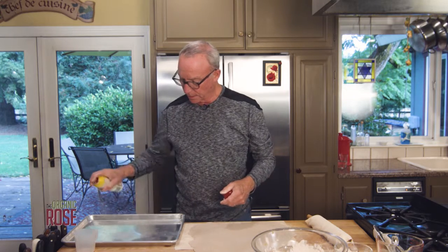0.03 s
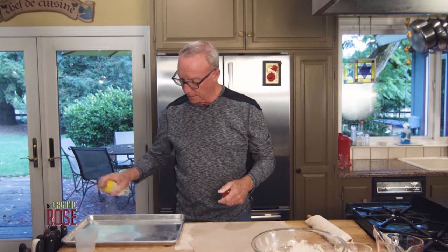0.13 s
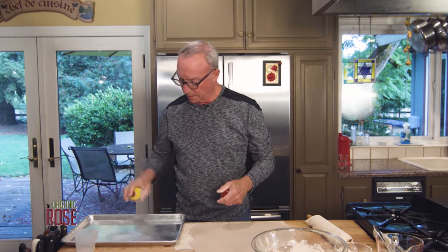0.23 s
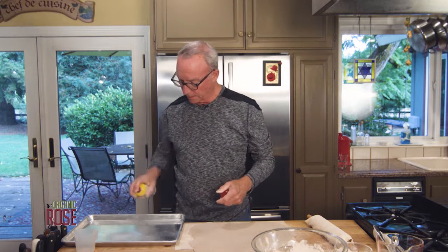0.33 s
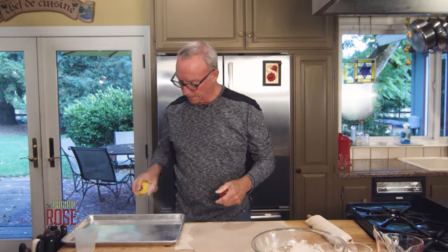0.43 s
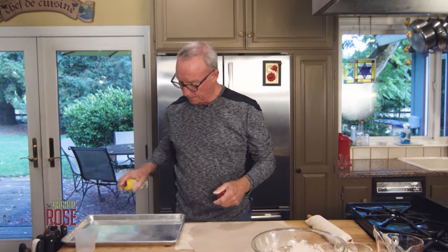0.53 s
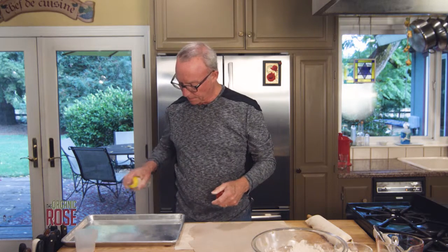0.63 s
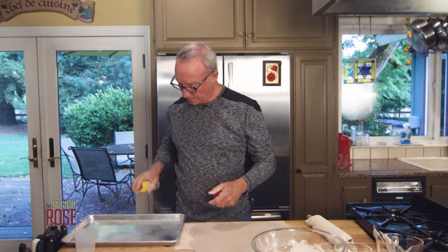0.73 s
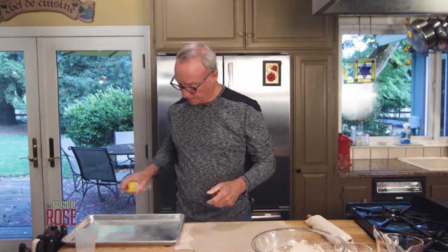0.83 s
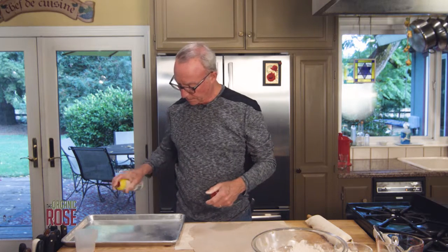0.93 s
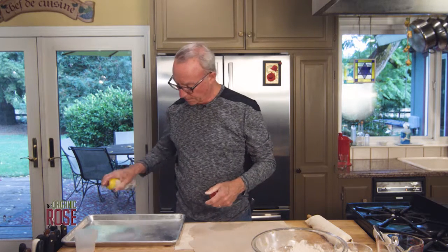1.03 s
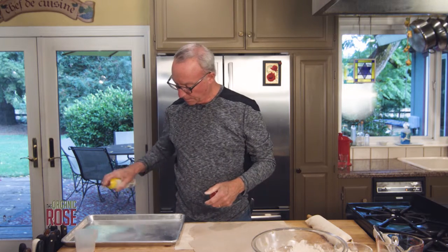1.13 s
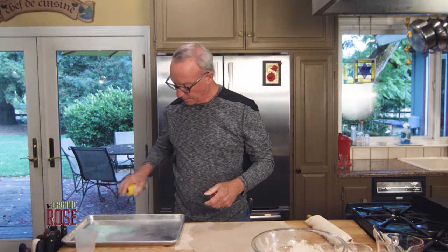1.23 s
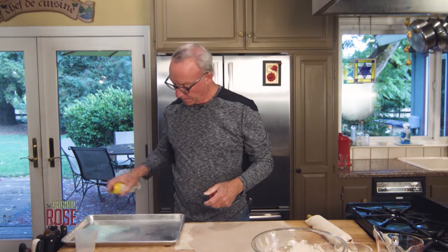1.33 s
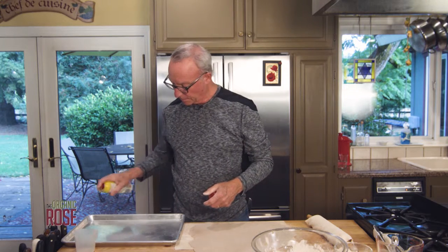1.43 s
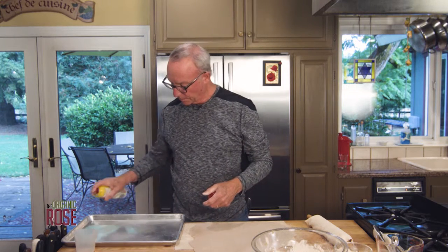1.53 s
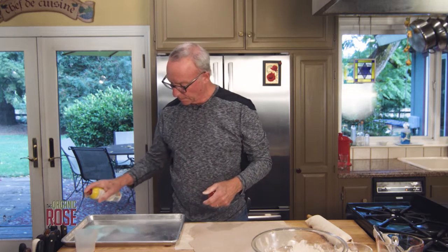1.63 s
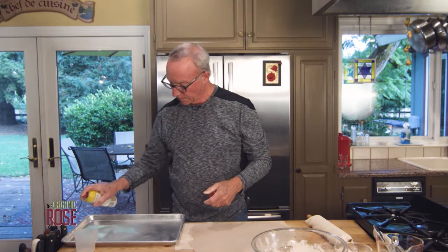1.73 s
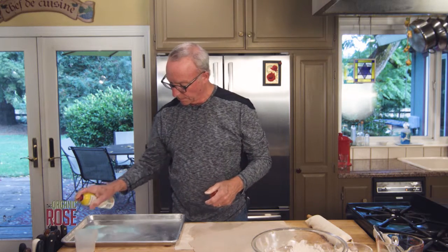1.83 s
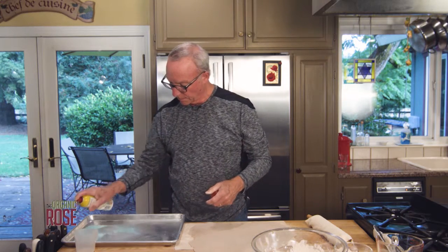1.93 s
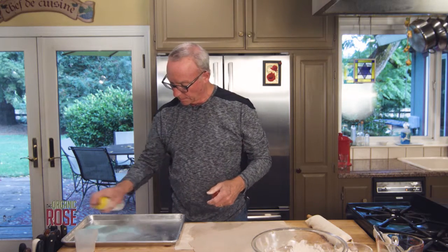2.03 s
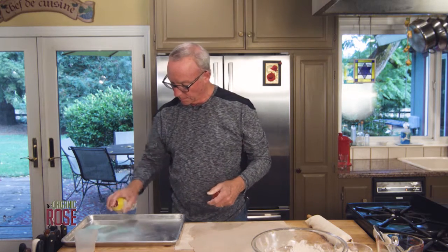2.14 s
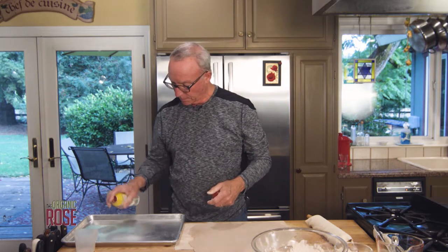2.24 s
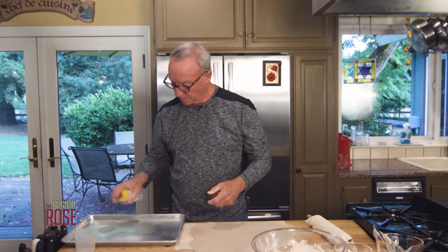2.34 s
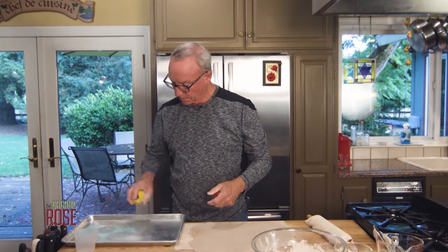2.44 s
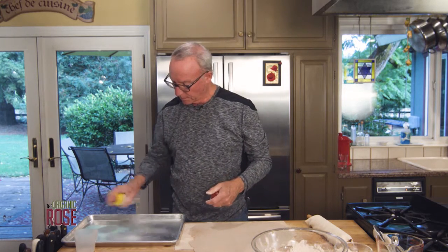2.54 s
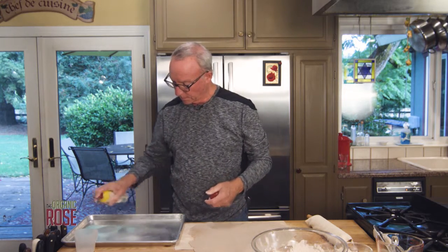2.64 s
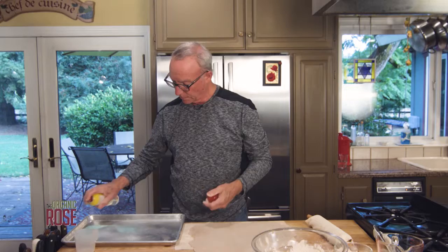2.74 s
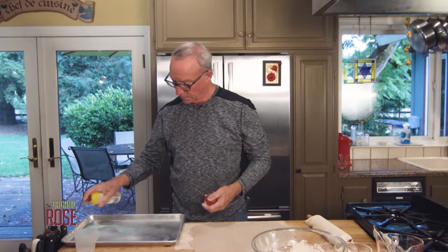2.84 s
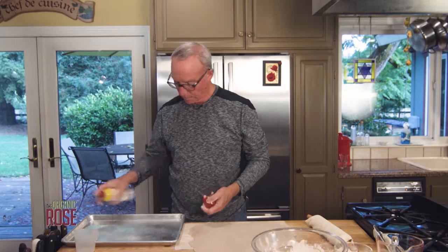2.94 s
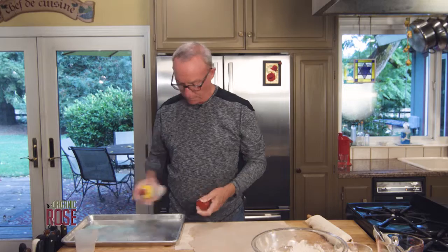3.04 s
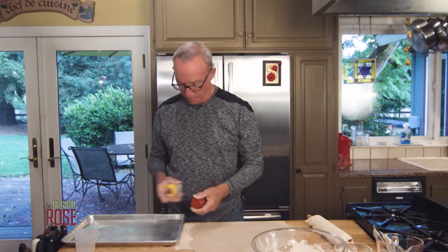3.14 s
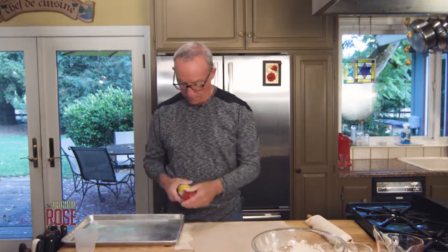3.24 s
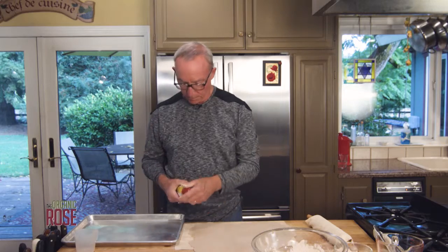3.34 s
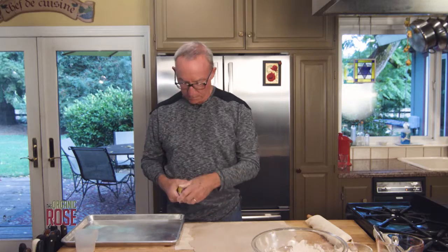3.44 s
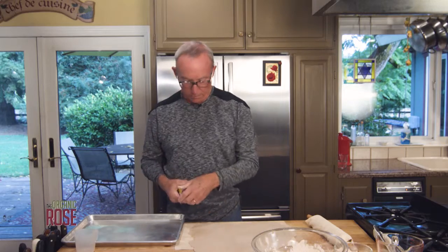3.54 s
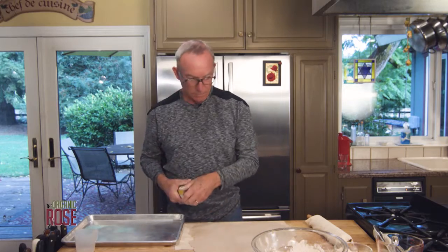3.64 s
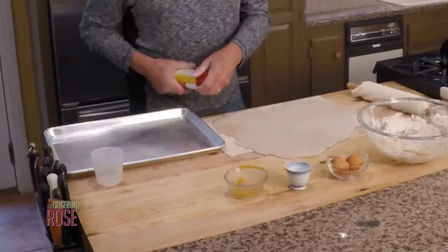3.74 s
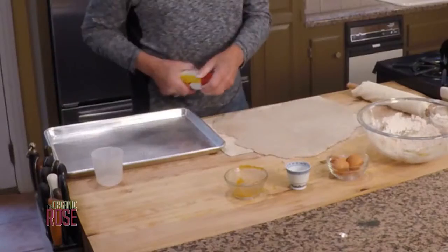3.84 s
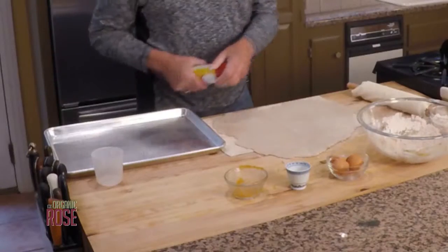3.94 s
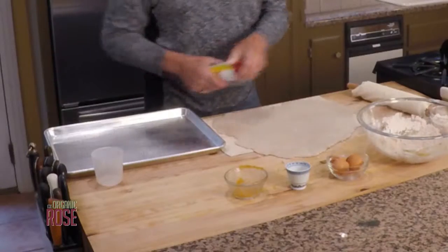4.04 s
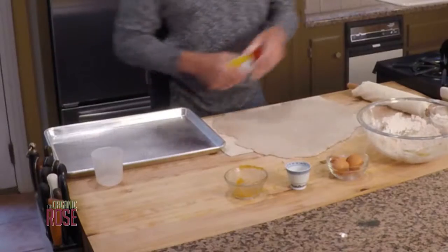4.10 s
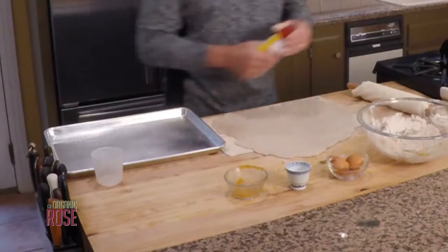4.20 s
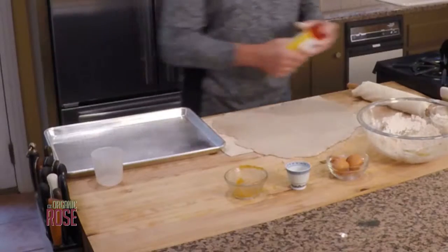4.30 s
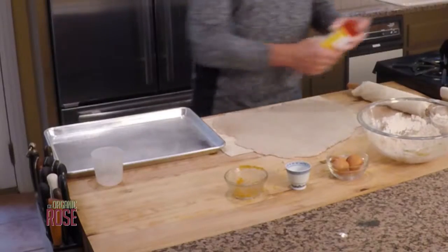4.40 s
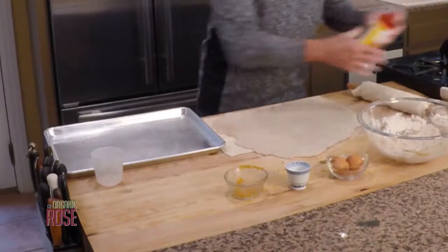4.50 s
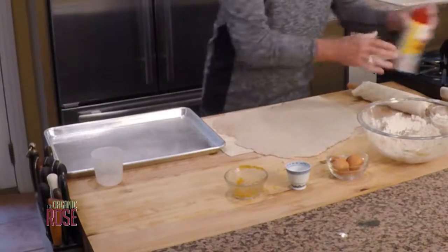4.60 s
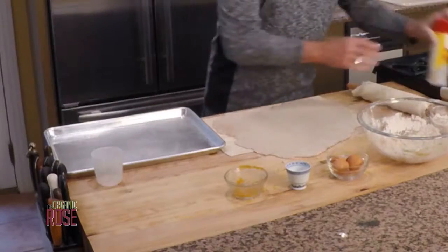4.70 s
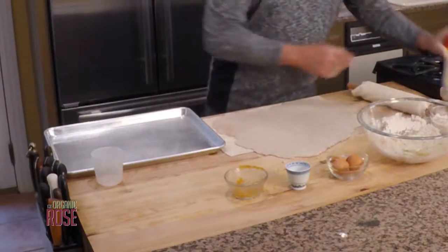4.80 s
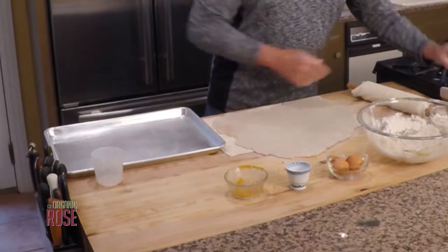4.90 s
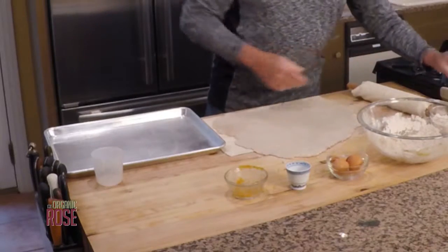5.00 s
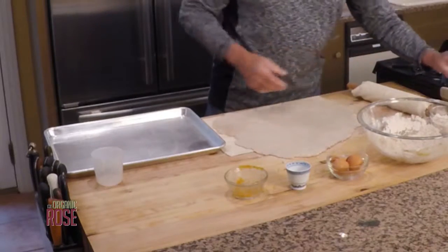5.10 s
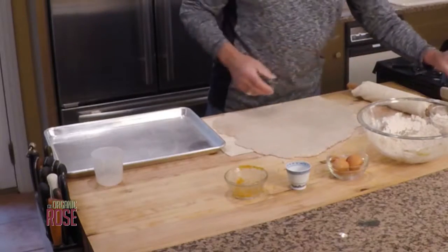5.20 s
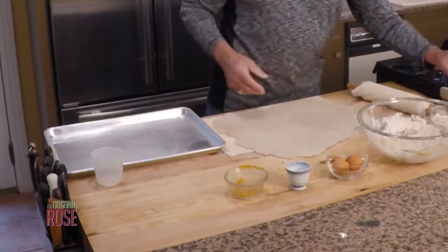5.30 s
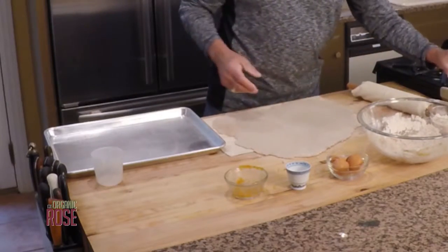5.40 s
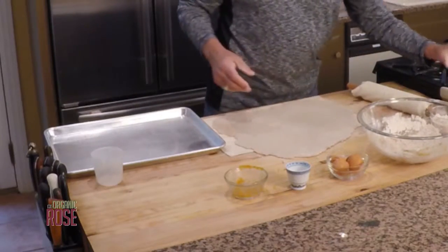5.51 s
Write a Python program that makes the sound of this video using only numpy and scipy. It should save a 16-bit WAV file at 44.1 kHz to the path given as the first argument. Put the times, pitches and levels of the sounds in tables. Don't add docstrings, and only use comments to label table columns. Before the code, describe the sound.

Quiet kitchen with a low fridge drone. A spray can hisses in short separate puffs, roughly four a second, over a metal baking sheet, the hiss colour gliding as it moves. Then soft skin rubbing and squeaking on plastic, a quick volley of cap clicks, more handling, and the can lands on a wooden counter with a firm double knock. Fairly close mono microphone, small live room.

```python
import sys
import numpy as np
from scipy import signal
from scipy.fft import rfft, irfft
from scipy.io import wavfile
from scipy.ndimage import map_coordinates

SR = 44100
rng = np.random.default_rng(int(sys.argv[2]) if len(sys.argv) > 2 else 0)


def volts_from_decibels(level):
    exponent = np.asarray(level, float) / 20
    return 10 ** exponent


def file_out(sig):
    cols = np.atleast_2d(sig).T
    lim = np.clip(cols, -1, 1)
    pcm = np.round(lim * 32767).astype(np.int16)
    wavfile.write(sys.argv[1], SR, pcm)


N = 245195
LEAD = 13230


def at_hz(points, hz):
    table_hz, values = np.transpose(points)
    return np.interp(np.log(hz), np.log(table_hz), values)


def in_time(rows):
    s, *columns = np.transpose(rows)
    now = (np.arange(N + LEAD) - LEAD) / SR
    return [np.interp(now, s, column) for column in columns]


def place(s):
    return int(round(s * SR)) + LEAD


def coloured(spectrum, low_hz=10, high_hz=20000):
    hz = np.maximum(np.fft.rfftfreq(N + LEAD, 1 / SR), 1)
    edges = np.sqrt((1 + (low_hz / hz) ** 10) * (1 + (hz / high_hz) ** 10))
    part = volts_from_decibels(at_hz(spectrum, hz)) / edges
    noise = irfft(rfft(rng.standard_normal(N + LEAD)) * part, N + LEAD)
    return noise / np.sqrt(np.mean(part ** 2))


def ring(clicks, hz, t60):
    r = volts_from_decibels(-60 / (t60 * SR))
    w = 2 * np.pi * hz / SR
    return signal.lfilter([0, np.sin(w)], [1, -2 * r * np.cos(w), r * r], clicks + 1e-18)


def strike(times, dbs, modes, scatter_db, contact_s):
    out = np.zeros(N + LEAD)
    luck = rng.standard_normal((len(times), len(modes)))
    first = place(min(times))
    span = min(SR // 2 + int(contact_s * SR), N + LEAD - first)
    t = np.arange(int(contact_s * SR) + 2) / SR
    for k, (hz, level_db, t60) in enumerate(modes):
        clicks = np.zeros(span)
        clicks[[place(s) - first for s in times]] = volts_from_decibels(dbs + level_db + scatter_db * luck[:, k])
        push = np.cos(2 * np.pi * hz * t) * 2 / len(t)
        pushed = signal.oaconvolve(clicks, push)[:span]
        out[first:first + span] += ring(pushed, hz, t60) * (-1) ** k
    return out


def blips(events):
    out = np.zeros(N + LEAD)
    for s, peak_db, hz, cycles in events:
        t = np.arange(int(1.5 * cycles / hz * SR)) / SR
        out[place(s):place(s) + len(t)] += volts_from_decibels(peak_db - 60 * t * hz / cycles) * np.sin(2 * np.pi * hz * t)
    return out


def swells(rows):
    out = np.zeros(N + LEAD)
    for s, rise, fall, db in rows:
        shape = np.r_[np.linspace(0, 1, int(rise * SR)), np.linspace(1, 0, int(fall * SR))]
        start = place(s) - int(rise * SR)
        out[start:start + len(shape)] += volts_from_decibels(db) * shape ** 0.97
    return out


# (frequency [Hz], density [dB per Hz])
ROOM_TONE = [(12, -33.5), (20, -2), (33, -16), (86, -10.5), (113, -18), (277, -21.5), (328, -33),
             (357, -24), (542, -24.5), (759, -25.5), (1060, -23), (1480, -27.5), (16000, -30.5)]
# (frequency [Hz], density [dB per Hz])
FRIDGE_DRONE = [(300, -15), (365, -9.5), (440, -32)]


def kitchen_floor():
    return volts_from_decibels(-65.5) * coloured(ROOM_TONE) + volts_from_decibels(-74) * coloured(FRIDGE_DRONE)


def valve(since, held_s, spurt, lag_s):
    build_s, open_s, shut_s = 0.014, 0.0011, 0.017
    build = 1 - (1 - spurt) * np.exp(-since / build_s)
    opened = 1 - np.exp(-since / (open_s + lag_s))
    return opened * build * np.exp(-np.maximum(since - held_s, 0) / shut_s)


# (time [s], held [s], pressure level [dB], nozzle aimed at the listener [dB], fineness of the mist [dB])
PUFFS = [(-.2, 0.18, -46.5, 3.5, 1.5), (.132, 0.16, -47, 5.5, 1), (0.452, 0.1, -46, 6, 1),
         (0.727, 0.12, -44.5, 3, -0.5), (1.037, 0.11, -47, 5, -5.5), (1.284, 0.11, -47, 5, -3),
         (1.559, .112, -48, 3, 0.5), (1.818, .118, -48, 0.5, 4), (2.174, 0.14, -45.5, -2, 10.5),
         (2.534, 0.099, -46, 2.5, 7), (2.778, 0.11, -46.5, 0, 7)]
HESITATIONS = [
    (2.13, 0.049, -54.5, -5.5, 12.5),
    (2.092, 0.033, -61.5, -9, 4),
]
# (share of full flow in first spurt [0-1], drift of highs [dB/s])
THUMB = [(.6, 2), (0.61, -4), (0.72, -12), (0.5, 10), (0.73, -9.5), (0.43, -8), (0.53, 11.5), (0.76, -6),
         (0.59, -22), (0.76, -18), (0.57, -24), (0.35, 38), (1, 0)]


def flows():
    dull_start_s = 0.0081
    bright_follows = 0.38
    out = np.zeros((4, N + LEAD))
    since = np.arange(SR // 3) / SR
    for (s, held_s, db, aim_db, fine_db), (spurt, drift) in zip(PUFFS + HESITATIONS, THUMB):
        spurt = np.clip(spurt, 0, 1)
        drift_db = drift * (np.minimum(since, held_s) - held_s / 2)
        wide = valve(since, held_s, spurt, 0)
        high = valve(since, held_s, spurt, dull_start_s * (1 - spurt))
        body = wide * volts_from_decibels(db)
        bright = high * volts_from_decibels(db + aim_db + bright_follows * drift_db)
        top = high * volts_from_decibels(db + aim_db + fine_db + drift_db)
        opening = wide * min(volts_from_decibels(db + 45), 1)
        out[:, place(s):place(s) + len(since)] += [body, bright, top, opening]
    return out


# (sheet echo [ms], glide [ms/s], strength [0-1], second echo [ms], strength [0-1])
MIRROR = [(.8, 0, .45, .6, .3), (.8, -.42, .45, .6, .3), (.77, -.42, .6, .25, .15),
          (.815, -.36, .4, 1.6, .25), (.705, -.12, .28, .31, .2), (.625, -.24, .3, .192, .3),
          (.62, -.38, .45, .237, .3), (.592, -.26, .5, .24, .2), (.548, -.17, .5, .243, .33),
          (.618, -.63, .63, .252, .3), (.585, -.79, .43, .237, .38)]


def sweep():
    hand_ms = 0.4
    rows = []
    for (s, held_s, *_), (ms, glide, share, ms_2, share_2) in zip(PUFFS, MIRROR):
        glide_2 = glide * (ms_2 > hand_ms)
        for t in (0, held_s):
            rows.append((s + t, ms + glide * t, share, ms_2 + glide_2 * t, share_2))
    return in_time(rows)


def late(x, ms):
    end = place(PUFFS[-1][0]) + SR // 2
    heard_at = np.arange(end) - ms[:end] * SR / 1000
    return np.r_[map_coordinates(x[:end], [heard_at], order=3), np.zeros(len(x) - end)]


# (frequency [Hz], density [dB per Hz])
JET = [(120, -33), (200, -14.5), (791, -9), (1270, -6), (1840, -5), (3430, -8.5), (4430, -9.5), (12200, -3),
       (14900, -4.5), (16000, -15.5)]


def spray():
    body, bright, top, opening = flows()
    jet = body * coloured(JET, 3000, 7500)
    jet = jet + bright * coloured(JET, 7500, 11500)
    jet = jet + top * coloured(JET, 11500)
    jet = jet + body * volts_from_decibels(-9.5) * coloured(JET, 10, 3000)
    jet = volts_from_decibels(-3.0) * jet
    lows = signal.sosfiltfilt(signal.butter(2, 3500, fs=SR, output="sos"), jet)
    beam = jet - 0.4 * lows
    sheet_ms, sheet, rim_ms, rim = sweep()
    mirrored = sheet * late(beam, sheet_ms) + rim * late(beam, rim_ms)
    gust_band = signal.butter(2, [7.0, 45], "band", fs=SR, output="sos")
    push = signal.sosfilt(gust_band, opening)
    return jet, mirrored, volts_from_decibels(-41) * push


# (frequency [Hz], t60 [s])
KITCHEN = [(125, 0.68), (500, 0.7), (2000, 0.41), (6000, 0.52), (14000, 0.31)]


def kitchen(x):
    t = np.arange(SR) / SR
    tail = 0
    for hz in 62.5 * 2 ** np.arange(9):
        edges = [hz / 2 ** .5, min(hz * 2 ** .5, .45 * SR)]
        band = signal.butter(2, edges, "band", fs=SR, output="sos")
        tail = tail + signal.sosfilt(band, rng.standard_normal(SR)) * volts_from_decibels(-60 * t / at_hz(KITCHEN, hz))
    tail = tail * np.clip((t - .002) / 0.0013, 0, 1)
    return signal.fftconvolve(x, tail / np.sqrt(np.sum(tail ** 2)))[:len(x)]


# (time [s], peak level [dB], pitch [Hz], time to die away [cycles])
TICKS = [(.425, -51.5, 1200, 12), (.459, -44.5, 960, 7.8), (1.047, -44.5, 1100, 9.5),
         (2.09, -38, 14700, 40), (2.0905, -43, 8000, 22), (2.515, -55, 1370, 25), (2.5355, -30, 8000, 53),
         (1.8205, -35, 8500, 14), (3.095, -59, 4200, 44), (3.127, -52, 10200, 90), (3.154, -55, 2800, 30),
         (3.155, -50, 10500, 30), (3.19, -56, 2500, 12), (3.337, -49, 12000, 43), (3.357, -49, 3300, 9.9),
         (3.437, -60, 3400, 120), (3.601, -37.5, 9200, 11), (3.6015, -38, 12200, 22),
         (3.845, -49.5, 2100, 12), (4.434, -50, 6800, 30), (4.436, -47, 4800, 18), (4.48, -56, 8000, 15),
         (4.739, -51, 10700, 56), (5.045, -54, 5400, 58)]


def ticks():
    return blips(TICKS)


# (time [s], peak level [dB], pitch [Hz], time to die away [cycles])
THUDS = [(0.456, -49, 120, 1.8), (0.732, -58, 70, 1.9), (1.037, -39, 130, 1.16), (2.031, -55.5, 101, 8),
         (2.169, -64, 60, 3.4), (2.538, -45, 69.5, 1.1), (2.7808, -36, 300, 1.6), (2.781, -47, 79.4, 2.4),
         (3.27, -47, 40.4, 4.3), (3.519, -40, 35, 3.4), (3.737, -43.5, 97, 2), (4.025, -50, 120, 5.5),
         (4.36, -55, 80.4, 6.4), (4.436, -45, 91, 2.7), (4.571, -49, 84.7, 5.2)]


def soft_thuds():
    return blips(THUDS)


# (time of peak [s], rise [s], fall [s], level [dB], fine part relative level [dB])
STROKES = [(3.0, .01, .1, -70, -1), (3.16, 0.045, .02, -76, 8), (3.258, .012, 0.042, -72, 15),
           (3.44, 0.12, 0.044, -81, 13), (3.72, 0.3, 0.23, -66.5, -1), (4.03, 0.057, 0.065, -67, -5),
           (4.138, 0.028, 0.043, -66.5, 0), (4.22, 0.079, 0.031, -64, -3), (4.332, 0.081, 0.017, -57, -2.5),
           (4.436, .012, .02, -62, -17), (4.5, .04, .06, -74, 0)]
# (time of peak [s], rise [s], fall [s], level [dB])
SQUEAKS = [(3.258, 0.009, 0.096, -65), (3.44, .06, .04, -69), (3.7, 0.074, 0.26, -68.5),
           (4.22, .05, .035, -61), (4.332, 0.057, 0.025, -64), (4.436, .015, .02, -69)]
# (time of peak [s], rise [s], fall [s], level [dB])
SHUFFLES = [(3.16, .05, .03, -75), (3.245, 0.055, 0.03, -68), (3.43, 0.091, .04, -72),
            (3.7, 0.14, 0.73, -68.5), (4.24, 0.095, 0.2, -64.5), (4.48, 0.076, 0.3, -67)]
# (frequency [Hz], density [dB per Hz])
RUB_COLOUR = [(2350, -60), (4000, -56), (5670, -11.5), (7750, -14), (9830, -15), (12900, -15), (14800, -17),
              (16000, -40)]


def rubbing():
    rub = swells([row[:4] for row in STROKES]) * coloured(RUB_COLOUR, 4800, 9000)
    fine_rows = [(s, rise, fall, db + fine_db) for s, rise, fall, db, fine_db in STROKES]
    fine = swells(fine_rows) * coloured(RUB_COLOUR, 9500)
    squeak = swells(SQUEAKS) * coloured([(1600, -25), (2650, -1), (3900, -25)])
    lows = coloured([(100, -20), (350, -1), (1200, -20)])
    scratch = volts_from_decibels(6.5 * np.clip(lows[::-1], -2, 2) - 6.5)
    return (rub + fine + squeak) * scratch + swells(SHUFFLES) * lows


# (time [s], lip level [dB], shell level [dB], hollow level [dB], crack level [dB])
SNAPS = [
    (3.4872, -28.5, -31.5, -41, -37),
    (3.5077, -40, -24, -37, -38),
    (3.5112, -36, -25, -35, -43),
    (3.5136, -39, -27, -17.5, -24),
    (3.5256, -50, -16.5, -39, -26),
    (3.5272, -44, -15, -43, -31),
]
# (frequency [Hz], level [dB], t60 [s])
CAP = [
    [(3344, -2.5, 0.028), (3430, -8, 0.0089)],
    [(2994, -3.5, 0.015), (2890, -43.5, 0.0078), (3248, -8, 0.0087), (2204, -7, 0.0067)],
    [(1150, 0, 0.016), (946, -11, 0.0079), (1385, -3, 0.0082), (1810, -3, 0.007)],
    [(789, -2.5, 0.063), (481, 1.5, 0.013), (334, -3, 0.014)],
    [(5960, -11, .003), (4440, 4, 0.0023), (7120, -8, 0.0018), (9300, 1.5, 0.0016), (11100, -4, .002),
     (12300, -1.5, 0.0023), (14200, -14, 0.0017)],
]


def cap():
    s, lip_db, shell_db, hollow_db, crack_db = np.transpose(SNAPS)
    wall_db = -39.5 + 0.84 * (shell_db - shell_db.mean())
    body = np.zeros(N + LEAD)
    for dbs, modes in zip((lip_db, shell_db, hollow_db, wall_db), CAP):
        body += strike(s, dbs, modes, scatter_db=3.5, contact_s=0.00071)
    chatter_s = 0.0012
    t = np.arange(SR // 100) / SR
    slips = rng.standard_normal(len(t)) * np.exp(-t / chatter_s)
    slips = slips / np.sqrt(np.sum(slips ** 2))
    crack = strike(s, crack_db - 6.0, CAP[-1], scatter_db=8, contact_s=0.0002)
    return body + signal.oaconvolve(crack, slips)[:N + LEAD]


# (time [s], body level [dB], edge level [dB])
SET_DOWN = [
    (5.0559, -13.5, -41.5),
    (5.0586, -18.5, -45.5),
    (5.0645, -19.5, -53),
    (5.102, -37, -72.5),
    (5.116, -36, -70),
]
# (frequency [Hz], level [dB], t60 [s])
CAN_BODY = [(46, -27, 0.08), (103, -26, 0.085), (268, -24, 0.043), (373, -13.5, 0.061), (496, -3, 0.061),
            (642, -6, 0.1), (772, -18.5, 0.087), (920, -8.5, 0.03), (1038, -13, 0.032), (1100, -13, 0.016),
            (1270, -10.5, 0.038), (1600, -10.5, 0.025), (1730, -2.5, 0.0077), (2020, -13, 0.016),
            (2800, -21.5, 0.011)]
# (frequency [Hz], level [dB], t60 [s])
CAN_EDGE = [(3620, -4, 0.0037), (4800, -1.5, 0.0049), (5600, -6, 0.0045), (7700, -3, 0.001),
            (10750, 1, 0.0012)]


def can():
    s, body_db, edge_db = np.transpose(SET_DOWN)
    body = strike(s, body_db - 8.5, CAN_BODY, scatter_db=5.5, contact_s=0.00067)
    return body + strike(s, edge_db, CAN_EDGE, scatter_db=6.0, contact_s=0.00021)


# (frequency [Hz], level [dB], t60 [s])
NEIGHBOUR = [(1186, -54, 0.79), (1220, -51, 0.43)]


def neighbour():
    return strike([SET_DOWN[0][0]], 0, NEIGHBOUR, scatter_db=1, contact_s=0.17)


def scene():
    floor = kitchen_floor()
    jet, mirrored, push = spray()
    small = ticks() + soft_thuds() + rubbing()
    snap = cap()
    knock = can()
    room = kitchen(volts_from_decibels(-8.0) * jet + volts_from_decibels(-12) * snap + volts_from_decibels(-10.5) * knock + volts_from_decibels(-14) * small)
    out = floor + jet + mirrored + push + small + snap + knock + neighbour() + room
    return out[None, LEAD:]


def band_limit(x):
    return signal.sosfilt(signal.butter(12, 16820, fs=SR, output="sos"), x)


def record(dry):
    cut = signal.sosfilt(signal.cheby2(16, 50, 16100, fs=SR, output="sos"), dry)
    mix = cut - 0.00128
    return band_limit(mix)


dry = scene()
out = record(dry)
file_out(out)
```